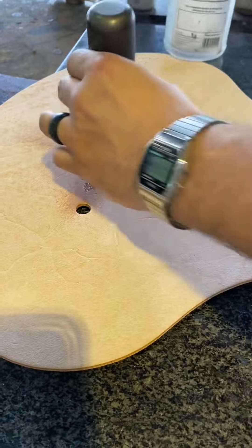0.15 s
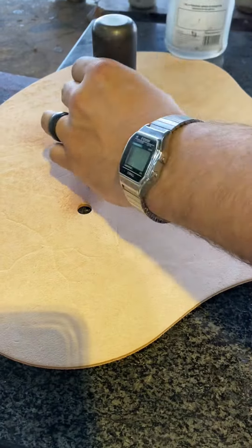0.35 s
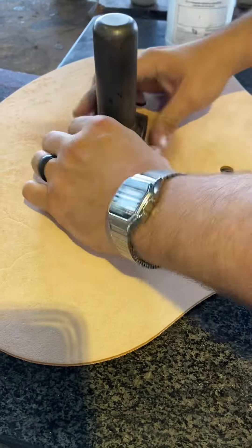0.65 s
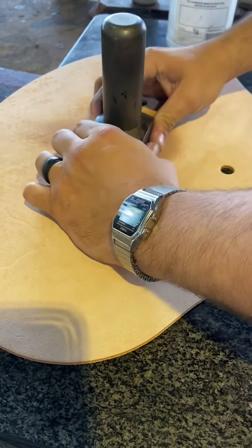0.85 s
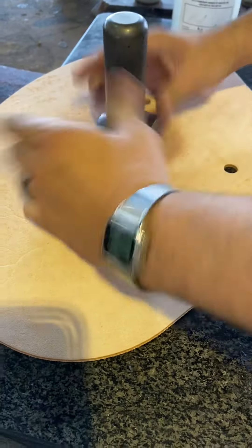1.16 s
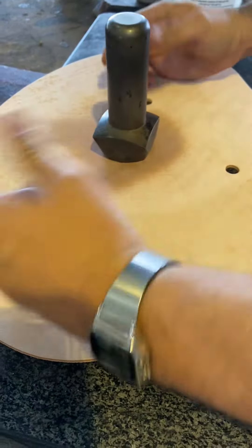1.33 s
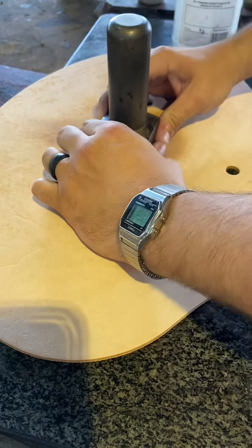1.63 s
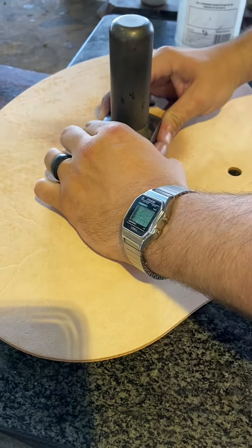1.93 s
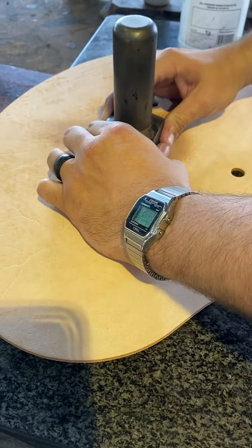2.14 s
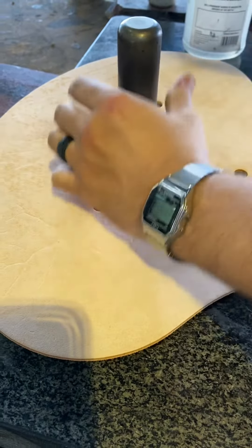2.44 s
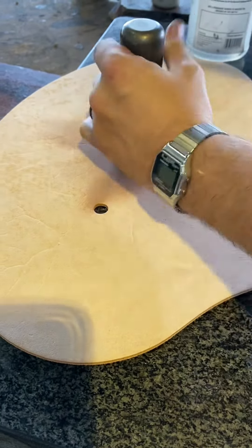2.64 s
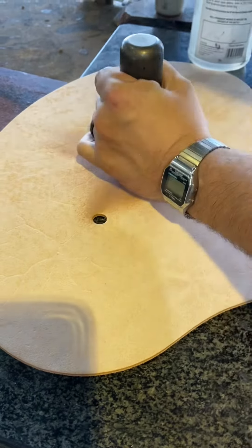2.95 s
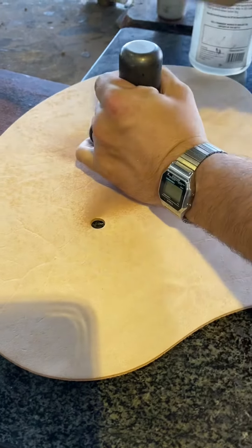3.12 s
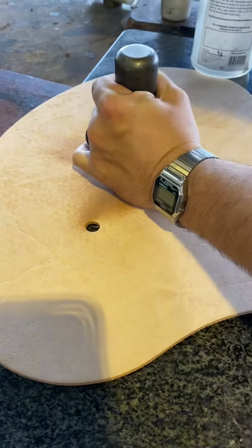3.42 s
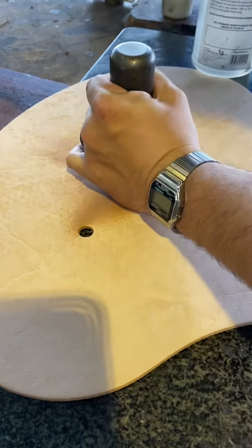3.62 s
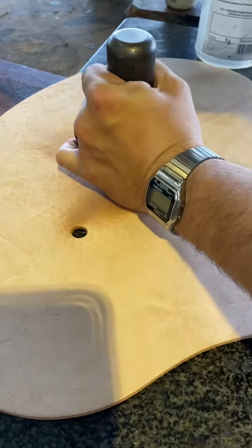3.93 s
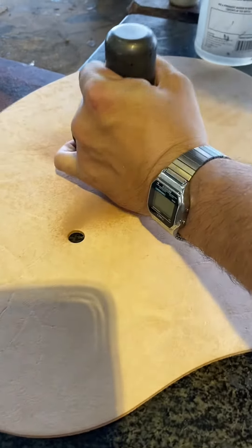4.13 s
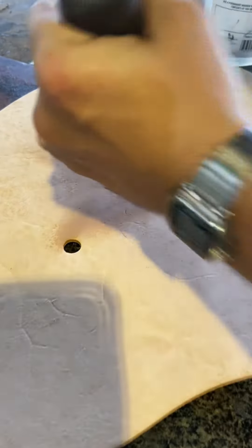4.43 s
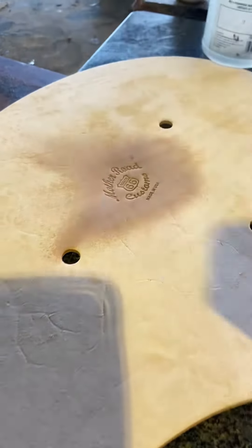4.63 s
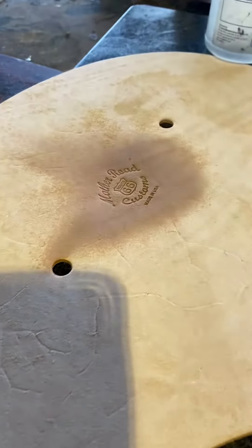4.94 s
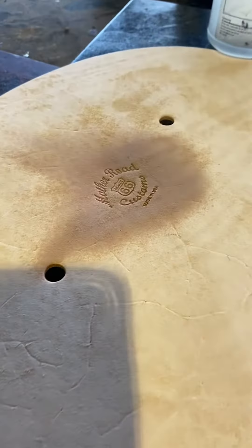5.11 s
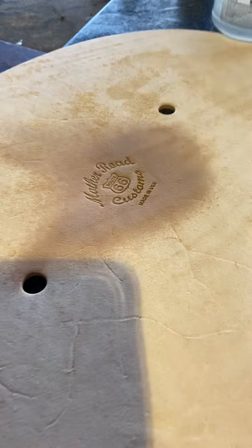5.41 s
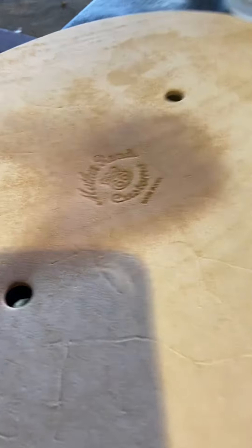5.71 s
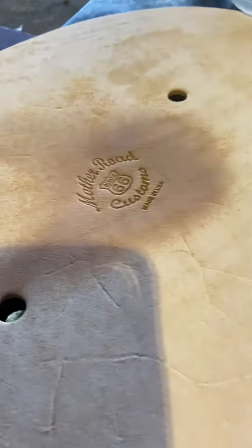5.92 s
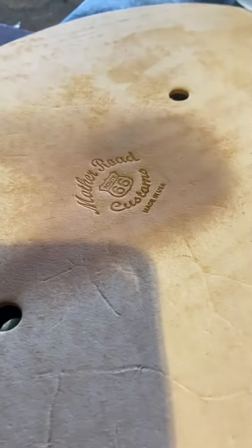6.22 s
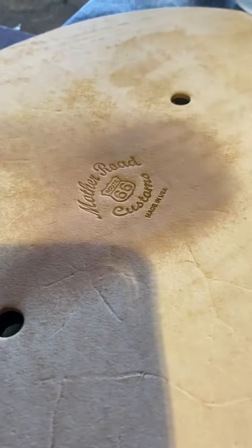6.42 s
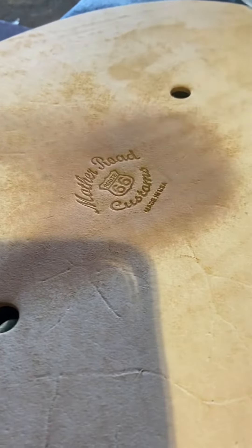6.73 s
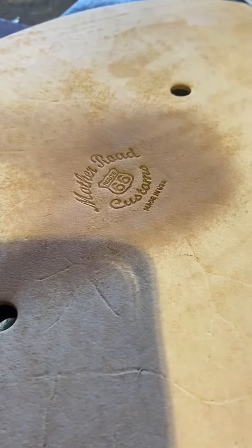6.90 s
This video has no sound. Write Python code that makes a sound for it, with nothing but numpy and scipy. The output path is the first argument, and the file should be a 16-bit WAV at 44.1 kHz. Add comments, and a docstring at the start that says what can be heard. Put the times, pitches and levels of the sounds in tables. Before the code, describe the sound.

A mallet taps a steel leather stamp, then lands one hard, sharp metallic strike, over a low motor hum in a workshop.

```python
"""In a workshop, a steel stamp is set on leather over a stone slab; a mallet taps it, then strikes hard.
Each impact excites the damped modes of stamp, mallet and bench, and sliding contact makes friction hiss.
A pump motor hums at harmonics of its shaft rate, and something heavy rumbles by outside.
The strike overloads the phone, whose gain ducks and stays lower while the stamp is put aside
and the phone moves in close."""
import sys
import numpy as np
from scipy import signal
from scipy.fft import rfft, irfft
from scipy.io import wavfile
from scipy.ndimage import uniform_filter1d, minimum_filter1d

SR = 44100
rng = np.random.default_rng(int(sys.argv[2]) if len(sys.argv) > 2 else 0)


def int16_out(signal):
    """Quantize to a 16-bit WAV file."""
    q = np.round(np.clip(np.atleast_2d(signal).T, -1, 1) * 32767)
    wavfile.write(sys.argv[1], SR, q.astype(np.int16))


N = 311346
T = np.arange(N) / SR
HZ = np.fft.rfftfreq(N, 1 / SR)
MOVE = np.clip((T - 4.75) / (5.4 - 4.75), 0, 1)  # the phone's travel: 0 at first, 1 once close
LOOSE_S = 4.5  # the hand stops pressing the stamp down
HARD_DB = -8  # blows above this flatten the mallet face

# Impacts: stamp set down, aiming tap, strike, bench settling, stamp put aside. Each row: start in
# seconds, bench, mallet, stamp and crack levels in dB, crack pitch in Hz, contact time in ms.
IMPACTS = [ (0.016, -44, -21.5, -38, -29, 1400, 0.86), (0.035, -61, -28.5, -60, -37, 2430, 0.88),
           (0.312, -29, -53, -62, -48, 1000, 3.5), (0.579, -65, -48, -73, -32, 1110, 0.4),
           (3.2056, -50, -21, -20.5, -17, 2100, 0.057), (3.2084, -9, -8.5, -24, -20, 700, 0.25),
           (3.211, -24.5, -23, -22, -18, 3950, 1), (3.2182, -19.5, -32, -36, -24.5, 5200, 0.11),
           (3.2196, -45, -40, -45, -21, 2280, 0.15), (3.2308, -23.5, -49, -35, -23.5, 2620, 0.13),
           (3.2362, -43, -48, -46, -28, 2000, 0.16), (3.7454, -22.5, 17.5, 10, 3, 2300, 0.056),
           (3.7478, -7, -5.5, 16.5, 20, 4850, 0.08), (3.7502, 2.5, 12.5, 14.5, 15.5, 1010, 0.12),
           (3.7524, -7, -5, -5, 19, 2390, 0.16), (3.755, 14, -17, -19, 2, 6950, 4.3),
           (3.853, -4, -33, -45, -11, 496, 3.4), (3.907, -4, -16, -45, -22, 780, 2.2),
           (3.942, -1.5, -30, -68.5, -22, 484, 3.4), (4.042, -7.5, -40, -46, -29, 508.5, 5.3),
           (4.265, -30.5, -26, -41, -18, 1060, 0.45), (4.523, -25.5, -33, -34, -21.5, 7960, 0.45),
           (4.5264, -20.5, -20, -19, -7.5, 4550, 1.1), (4.528, -32.5, -39.5, -41, -19, 973, 0.88),
           (4.538, -21, -42, -34.5, -16, 3760, 0.15), (4.547, -21, -40, -50, -26, 4470, 0.54),
           (4.553, -17, -53, -53, -39, 3000, 0.35)]
def knocks():
    """Impact excitation: shorter pushes reach higher modes. Returns direct sound, room feed and clunk."""
    on_bench, tapped, struck, on_stamp, cracks, clicks = np.zeros((6, N))
    for start, bench_db, mallet_db, stamp_db, crack_db, crack_hz, contact_ms in IMPACTS:
        i, n = int(start * SR), int(contact_ms * SR / 1000) + 2
        push = np.sin(np.pi * np.arange(1, n) / n)
        push /= push.sum()
        on_bench[i:i + n - 1] += undb(bench_db) * push
        on_mallet = struck if mallet_db > HARD_DB else tapped
        on_mallet[i:i + n - 1] += undb(mallet_db) * push
        on_stamp[i] += undb(stamp_db)
        cracks[i:i + 1800] += undb(crack_db) * crack(crack_hz)
        # the room receives a clean click, stronger once the hand no longer shields the stamp
        click = steep_band(signal.unit_impulse(900), crack_hz, 0.74 * crack_hz)
        click_db = crack_db - 9 + 0.5 * (start > LOOSE_S)
        clicks[i:i + 900] += undb(click_db) * click / np.linalg.norm(click)
    direct = cracks + bench(on_bench) + sheet_metal(struck) + mallet(tapped, struck) + stamp(on_stamp)
    mic_low_cut = signal.butter(2, 46.45, "high", fs=SR)
    return signal.lfilter(*mic_low_cut, direct), clicks + 0.72 * on_bench, clunk(struck)


# Stamp modes. Each row: frequency in Hz, held level in dB, held T60 in seconds, free level in dB.
STAMP_MODES = [(1772, -8, .025, -40), (2220, -7, .012, -32), (2866, -9.5, .012, -36),
               (3590, -12, .012, -20), (3770, 1, .016, -14), (4580, -3, .011, -17), (4880, 0, .016, -19),
               (5100, -10, .01, -22), (5900, -13, .01, -40), (7200, -7, .015, -40), (7760, -11, .14, -24),
               (7850, -17, .08, -28), (8250, -16, .03, -30), (9940, -26, .01, -40)]
def stamp(force, free_t60_s=0.41):
    """Contact damping: held steel rings briefly; let go, it rings on, roughened by its rocking."""
    held = ring(force, [(hz, db, t60) for hz, db, t60, _ in STAMP_MODES])
    free = ring(force * (T > LOOSE_S), [(hz, db, free_t60_s) for hz, _, _, db in STAMP_MODES])
    return held + free * (.3 + walk(300))


# Head and handle modes. Each row: frequency in Hz, tapped and struck levels in dB, T60 in seconds.
MALLET_MODES = [(581, -6, -16, .05), (711, -12, 3, .016), (850, -9, -3, .012), (1060, -4, 7, .016),
                (1365, -1, -5, .045), (2094, -4, -4, .02), (2370, -8, 7, .009), (2900, -14, 1, .007)]
def mallet(tapped, struck):
    """Nonlinear contact: a flattened face weights the same modes differently from a light tap."""
    soft = ring(tapped, [(hz, db, t60) for hz, db, _, t60 in MALLET_MODES])
    hard = ring(struck, [(hz, db, t60) for hz, _, db, t60 in MALLET_MODES], sign=-1)
    return soft + hard


# Bench and slab modes. Each row: frequency in Hz, level in dB, T60 in seconds.
BENCH_MODES = [(104.3, -2.5, 0.3368), (150.5, -0.5, 0.07), (215.6, -4.5, 0.062), (272, -10.5, 0.15)]
def bench(force):
    """Free vibration: the low modes of bench and slab decay as a thud."""
    return ring(force, BENCH_MODES)


def crack(hz):
    """A brief transient has a broad spectrum: a snap of noise round hz, then a wider, gritty tail."""
    burst = rng.standard_normal(900) * np.exp(-T[:900] / .0016)
    snap = steep_band(burst, hz, 0.23 * hz)
    grit_hz = min(3200, 2 * hz)
    grit = steep_band(rng.standard_normal(1800), grit_hz, 1.8 * grit_hz)
    out = undb(-11) * grit * np.exp(-T[:1800] / .004)
    out[:900] += snap / np.abs(snap).max()
    return out


# Partials of the strike's low clunk. Each row: frequency in Hz, level in dB, T60 in seconds.
CLUNK_PARTIALS = [(190.9, -14, 0.044), (400, -9, 0.012), (690, -3.5, 0.027)]
def clunk(struck):
    """Antiphase: the hard strike's brief low clunk is opposite in left and right, which widens it."""
    side = ring(struck, CLUNK_PARTIALS)
    return np.array([side, -side])


# Sheet metal modes. Each row: frequency in Hz, level in dB, T60 in seconds.
SHEET_MODES = [(1255, -41, 1.5), (1283, -41, 1.5), (1300.6, -37.5, 1.3), (1345, -33, .4)]
def sheet_metal(struck):
    """Sympathetic vibration: nearby sheet metal rings with a hard blow, its level wavering."""
    return ring(struck, SHEET_MODES) * undb(2 * walk(25))


# Small dry ticks. Each row: start in seconds, peak level in dB, pitch in Hz.
DRY_TICKS = [(0.016, -40, 10500), (0.034, -42, 10500), (0.1176, -47, 4040), (0.142, -44, 5750),
             (0.166, -41, 10700), (0.167, -36, 14500), (0.174, -50, 9500), (0.173, -41, 3200),
             (0.309, -46, 5000), (0.4353, -37.5, 2560), (0.436, -52, 9500), (0.7861, -47, 4540),
             (2.677, -43.5, 4800), (2.9274, -47, 10000), (2.9355, -40.5, 10800), (3.577, -47, 3870),
             (4.785, -56, 10100), (4.808, -41, 4850), (4.807, -36, 1997), (4.902, -52.5, 11150),
             (4.912, -46, 11200), (4.992, -54.5, 9000)]
def ticks(decay_s=0.0027):
    """Exponential decay: narrow-band noise that dies within milliseconds is heard as a tick."""
    out = np.zeros(N)
    for start, db, hz in DRY_TICKS:
        i = int(start * SR)
        burst = band(rng.standard_normal(600), hz, 0.21 * hz) * np.exp(-T[:600] / decay_s)
        out[i:i + 600] += undb(db) * burst / np.abs(burst).max()
    return out


# Slides. Each row: midpoint and length in seconds, level in dB, relative level of the upper band in dB.
SLIDES = [(0.027, 0.048, -48, -18), (0.176, 0.085, -62, -12), (0.662, 0.09, -62, -18),
          (1.138, 0.13, -57, -11), (1.433, 0.22, -54.5, -23), (2.684, 0.14, -66, -19),
          (2.952, 0.075, -76, 9), (3.062, .04, -70, 1), (3.515, 0.1, -64.5, -6)]
def rubs():
    """Sliding friction: skin and steel on leather make a grainy two-band hiss that swells and fades."""
    low, high = np.zeros((2, N))
    for middle, length, db, treble_db in SLIDES:
        swell = undb(db) * np.cos(np.pi * np.clip((T - middle) / length, -.5, .5))
        low += swell
        high += swell * undb(treble_db)
    grain = rng.standard_normal((2, N)) * undb(1.4 * walk(120))
    return low * level(band(grain[0], 3600, 4100), 0) + high * level(band(grain[1], 10500, 4300), 0)


# Hum, harmonics 6 to 24. Each row: level in dB before the phone moves, level in dB after.
HUM_LEVELS = [(-54.5, -56), (-64.5, -53), (-54, -56), (-52, -52.5), (-51, -51.5), (-52, -48.5), (-52, -57),
              (-59.5, -57), (-52.5, -48), (-55.5, -56.5), (-54, -55), (-67.5, -55), (-67.5, -70),
              (-57.5, -53.5), (-51, -63.5), (-53.5, -47.5), (-73.5, -54.5), (-65.5, -74), (-49.5, -56)]
# Prominent higher harmonics. Each entry: a multiple of the shaft rate.
WHINE_HARMONICS = (32, 36, 40, 48, 55, 56, 59, 60, 61, 63, 64, 67, 69, 71, 72, 73, 75, 77, 83, 84, 87, 96,
                   99, 100, 104, 106)
# Their strengths. Each row: level in dB before the phone moves, level in dB after.
WHINE_LEVELS = [(-70, -66.5), (-64.5, -63.5), (-76, -69.5), (-77, -70), (-83, -82), (-83.5, -79),
                (-69.5, -71.5), (-62.5, -60), (-80, -76), (-77.5, -74), (-78, -67), (-68, -73),
                (-64.5, -71), (-76.5, -62.5), (-70.5, -67), (-66.5, -63), (-65, -91), (-66.5, -79),
                (-66.5, -84), (-70, -65.5), (-62, -75), (-64, -60.5), (-63.5, -78), (-77, -67),
                (-74.5, -71), (-71.5, -65)]
# Envelope of all other harmonics. Each row: frequency in Hz, mean level in dB.
WHIRR_SPECTRUM = [(30, -70), (150, -70.5), (750, -73), (1200, -73.5), (1600, -94), (1900, -77),
                  (2300, -74.5), (3100, -73.5), (3250, -95.5), (4200, -100.5)]
def motor(shaft_hz=29.494):
    """Rotation gives a harmonic series; standing waves give each harmonic its own level and phase."""
    prominent = dict(enumerate(HUM_LEVELS, start=6))
    prominent.update(zip(WHINE_HARMONICS, WHINE_LEVELS))
    out = np.zeros((2, N))
    steps = np.arange(0, T[-1] + .1, .02)
    travel = np.interp(steps, T, MOVE)
    for order in range(1, 125):
        hz = order * shaft_hz
        scatter_db = 3 * rng.standard_normal(2)
        phase, pan, skew = rng.standard_normal(3)
        before_db, after_db = prominent.get(order, colour(hz, WHIRR_SPECTRUM) + scatter_db)
        flutter_db = 1.8 * (1 + hz / 4000) * uniform_filter1d(rng.standard_normal(len(steps)), size=2)
        db = before_db + (after_db - before_db) * travel + flutter_db
        amplitude = np.sqrt(2) * np.interp(T, steps, undb(db))
        spread = min(hz / 2300, 1.1)  # shorter waves differ more between the ports
        for channel, sign in enumerate((1, -1)):
            angle = 2 * np.pi * hz * T + 10 * phase + sign * 0.515 * spread * skew
            out[channel] += amplitude * undb(sign * 2 * spread * pan) * np.sin(angle)
    return out


# Air and motor noise: in phase at the ports before and after the move, and in antiphase throughout.
# Each row: frequency in Hz, relative spectral density in dB.
AIR_FAR = [(15, -48), (25, -32), (59, 7), (200, -6), (354, -7.5), (516, -28.5), (607, -15.5), (863, -22),
           (1560, -27.5), (1740, -24.5), (2910, -29), (6210, -39), (7310, -65), (8590, -42), (16000, -61)]
AIR_NEAR = [(15, -65.5), (25, -22), (53, 6.5), (141, 5.5), (326, -13.5), (373, -18), (405, -14), (531, -14),
            (624, -20), (754, -20.5), (1040, -23), (1520, -21.5), (1800, -18.5), (2840, -23), (3430, -26),
            (6200, -33.5), (7300, -53), (8600, -38), (16000, -48)]
AIR_SIDE = [(15, -39), (25, -13.5), (84, -34), (354, 6), (439, -6.5), (516, 4.5), (1610, -23), (2610, -2.5),
            (3620, -23.5), (7510, -25), (16000, -51)]
def air():
    """Independent noises add in power: one spectrum fades into another as the phone moves."""
    def noise(spectrum, db):
        shaped = irfft(rfft(rng.standard_normal(N)) * undb(colour(HZ, spectrum)), N)
        return level(shaped, db) * undb(0.32 * walk(2))
    mid = np.sqrt(1 - MOVE) * noise(AIR_FAR, -43.5) + np.sqrt(MOVE) * noise(AIR_NEAR, -45.5)
    side = noise(AIR_SIDE, -52)
    return np.array([mid + side, mid - side])


def drone():
    """Random modulation: a low tone wavers in pitch and level."""
    hz = 63 + 3 * walk(5.3)
    return level(np.sin(2 * np.pi * np.cumsum(hz) / SR), -45) * undb(0.97 * walk(8.9))


# Swell of the rumble outside. Each row: time in seconds, level of the lower band in dB.
RUMBLE_SWELL = [(0.8, -49.5), (1.65, -46), (2.02, -41), (2.3, -38.5), (2.61, -33), (3.05, -46), (3.32, -40),
                (3.7, -44.5)]
def rumble():
    """Amplitude modulation: two low bands of noise rise and fall as something heavy passes."""
    low = level(steep_band(rng.standard_normal(N), 115, 103), 0)
    high = level(steep_band(rng.standard_normal(N), 230, 100), -10)
    swell_db = np.interp(T, *np.transpose(RUMBLE_SWELL), left=-70, right=-70)
    return undb(swell_db + 0.75 * walk(8.73)) * (low + high)


# Workshop reverberation. Each row: centre and bandwidth in Hz, level in dB, T60 in seconds.
ROOM_BANDS = [(97, 50, -32, 3.3), (195, 130, -28, 2.3), (380, 310, -24.5, 1), (770.3, 1400, -32, 0.52),
              (1540, 1570, -36, 1.44), (3168, 2900, -40, 1.35), (4440, 1600, -40, 0.83),
              (10100, 4000, -33, .8)]
def reverberation(x):
    """Diffuse field: convolution with decaying noise, more alike at the two ports in the bass."""
    t, response = T[:2 * SR], 0
    for hz, width_hz, db, t60 in ROOM_BANDS:
        mid = level(steep_band(rng.standard_normal(len(t)), hz, width_hz), db)
        side = level(steep_band(rng.standard_normal(len(t)), hz, width_hz), db)
        side *= min(0.09 + hz / 4300, 1.2)
        fade = undb(-60 * t / t60) * (1 - np.exp(-t / 0.0026))
        response = response + fade * np.array([mid + side, mid - side])
    return signal.fftconvolve(x[None], response, axes=1)[:, :N]


# Phase between the ports. Each row: frequency in Hz, lead of the left port in radians.
PORT_PHASE = [(0, 0), (2400, .7), (5000, .3), (6500, 2.8), (8300, 3.7), (9400, 6.0), (11600, 6.6),
              (12400, 9.3), (14400, 9.5), (15600, 12.3)]
# Capsule response. Each row: frequency in Hz, gain in dB.
CAPSULE_GAIN = [(5000, -1), (6300, 0.5), (7300, 0), (8300, 2.5), (11000, -1.5), (12500, -4), (14500, -2),
                (15500, -0.5)]
def ports(x):
    """Transfer function: sound reaches the two microphone ports out of step; the capsules colour it."""
    turn = np.exp(.5j * np.interp(HZ, *np.transpose(PORT_PHASE)))
    return irfft(rfft(x) * np.array([turn, turn.conj()]) * undb(colour(HZ, CAPSULE_GAIN)), N)


def ring(force, modes, sign=1):
    """Modal superposition: a force rings damped sines; with sign -1 neighbours start in opposition."""
    out = 0
    for k, (hz, db, t60) in enumerate(modes):
        pole = np.exp(2j * np.pi * hz / SR - np.log(1000) / (t60 * SR))
        out = out - sign ** k * undb(db) * signal.lfilter([1], [1, -pole], force).imag
    return out


def band(x, hz, width_hz):
    """Resonance: a band-pass with unit gain at its centre."""
    return signal.lfilter(*signal.iirpeak(min(hz, .45 * SR), hz / width_hz, SR), x)


def steep_band(x, hz, width_hz):
    """Two resonators in cascade give steeper skirts."""
    return band(band(x, hz, width_hz), hz, width_hz)


def walk(rate_hz):
    """Low-pass noise: random steps smoothed twice, with a spread near 1."""
    hold = int(SR / rate_hz)
    steps = np.repeat(rng.standard_normal(N // hold + 1), hold)
    return 1.3 * uniform_filter1d(uniform_filter1d(steps, hold), hold)[:N]


def colour(hz, spectrum):
    """Spectral envelope in dB, interpolated over log frequency."""
    points_hz, db = np.transpose(spectrum)
    return np.interp(np.log(np.maximum(hz, 1)), np.log(points_hz), db)


def undb(db):
    """Decibels as an amplitude ratio."""
    return 10 ** (np.asarray(db) / 20)


def level(x, db):
    """Normalisation to an RMS level in dB."""
    return x * undb(db) / np.sqrt(np.mean(x ** 2))


def release(db, db_per_s):
    """Peak detection: follows rises at once and falls at a steady rate."""
    return np.maximum.accumulate(db + db_per_s * T) - db_per_s * T


def scene():
    """Superposition: handwork and background add, leaning further left as the phone moves."""
    direct, room_feed, wide_clunk = knocks()
    background = motor() + air() + drone() + rumble()
    handwork = ports(direct + rubs() + ticks() + reverberation(room_feed)) + wide_clunk
    lean_db = 0.6 + 0.7 * MOVE  # left minus right
    return (handwork + background) * undb([lean_db / 2, -lean_db / 2])


def record(dry):
    """Automatic gain control: peaks are limited, overload ducks the gain; soft clip and low-pass follow."""
    ceiling_db, overload_db, duck_db, step_db = 3, 8, 37.5, 16.5
    lag_s, duck_s, clip, top_hz = .009, 0.018, .88, 15800
    peak_db = 20 * np.log10(np.abs(dry).max(axis=0) + 1e-9)
    excess_db = np.maximum(peak_db - ceiling_db, 0)
    look_ahead = -minimum_filter1d(-excess_db, size=177)
    limit = uniform_filter1d(release(look_ahead, db_per_s=890), size=88)
    tripped = np.roll(excess_db > overload_db, int(lag_s * SR))
    # the deep duck recovers quickly, but only to a lower gain that creeps back
    target = np.maximum(release(duck_db * tripped, 84.5), release(step_db * tripped, 0.32))
    slew = 1 / (duck_s * SR)
    duck = signal.lfilter([slew], [1, slew - 1], target)
    rounded = clip * np.tanh(dry * undb(-np.maximum(limit, duck)) / clip)
    return signal.sosfilt(signal.ellip(10, .2, 80, top_hz, fs=SR, output="sos"), rounded)


dry = scene()
out = record(dry)
int16_out(out)
```